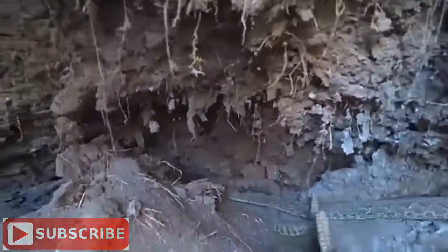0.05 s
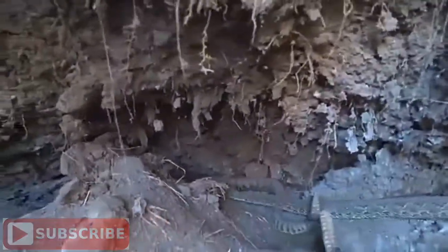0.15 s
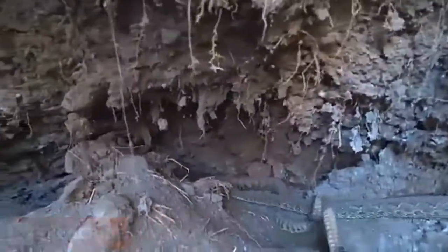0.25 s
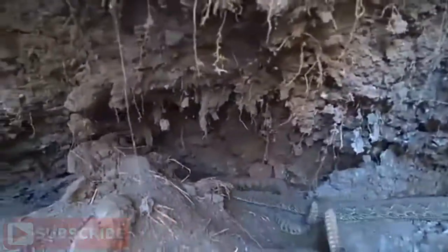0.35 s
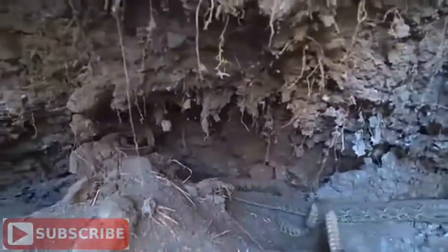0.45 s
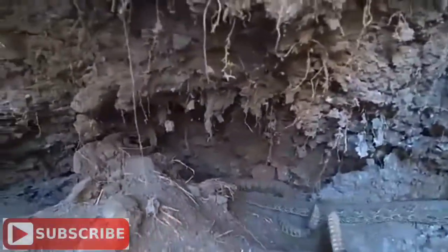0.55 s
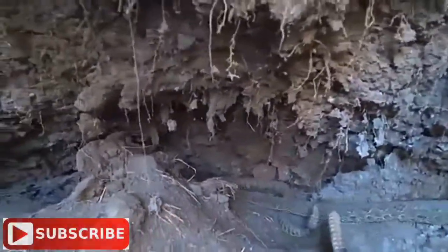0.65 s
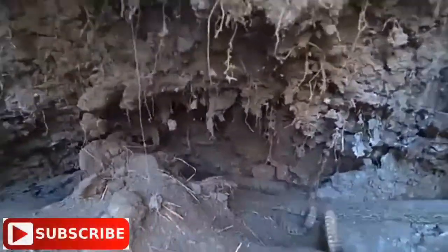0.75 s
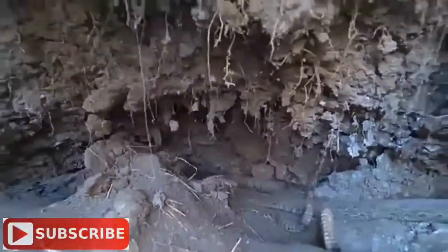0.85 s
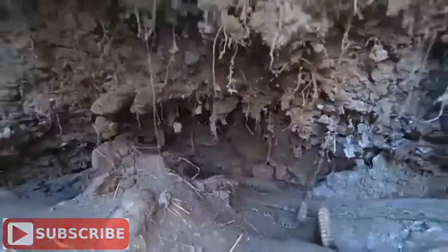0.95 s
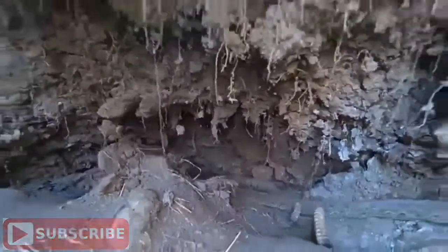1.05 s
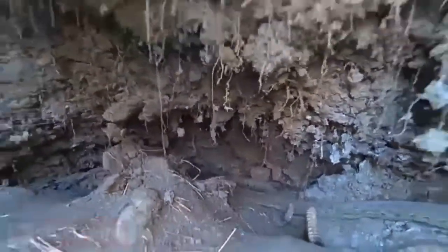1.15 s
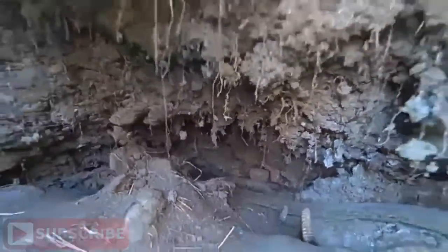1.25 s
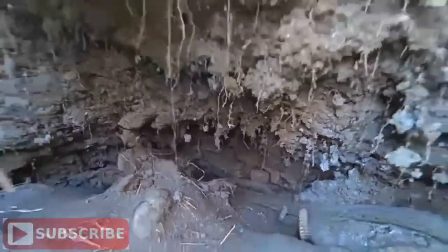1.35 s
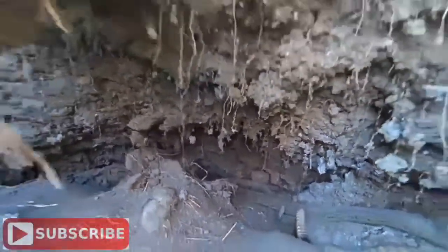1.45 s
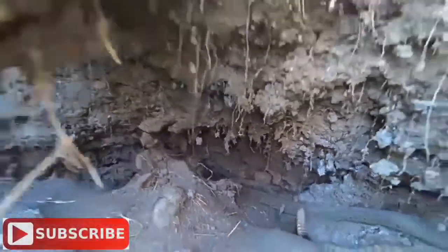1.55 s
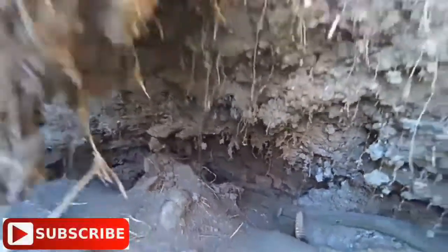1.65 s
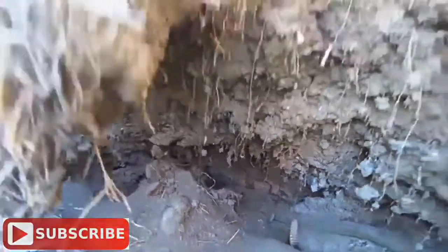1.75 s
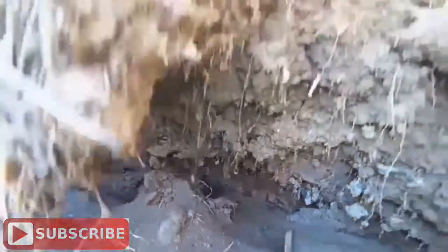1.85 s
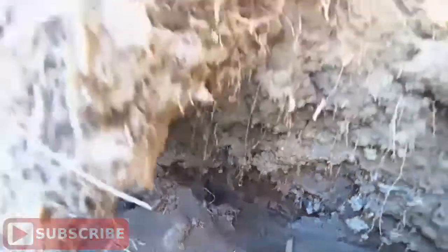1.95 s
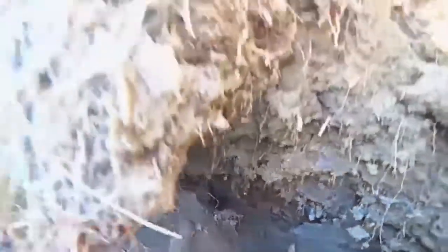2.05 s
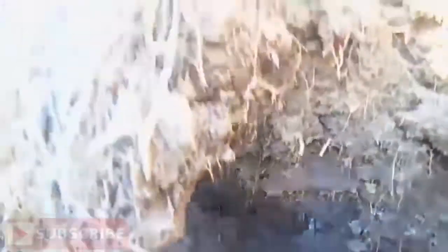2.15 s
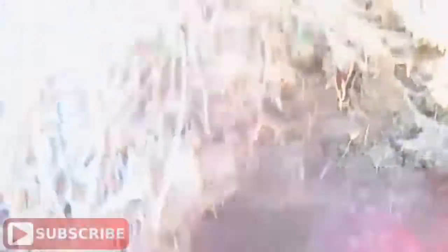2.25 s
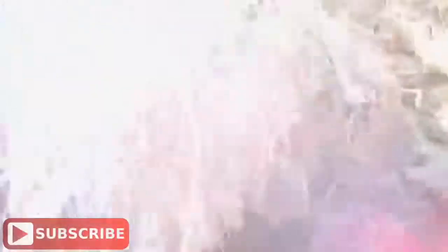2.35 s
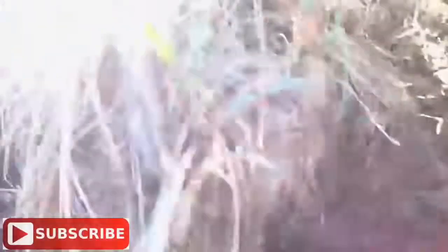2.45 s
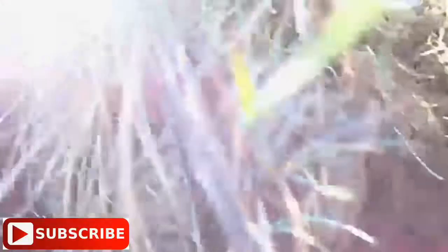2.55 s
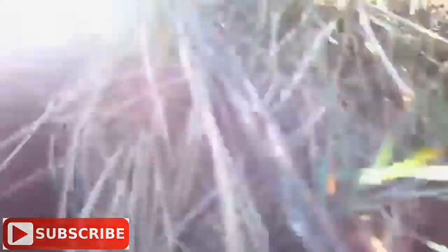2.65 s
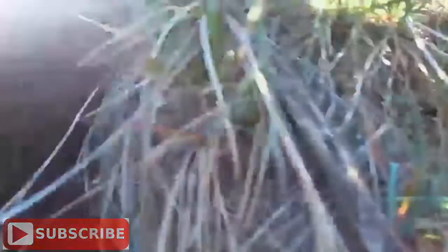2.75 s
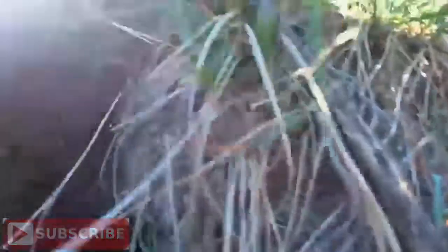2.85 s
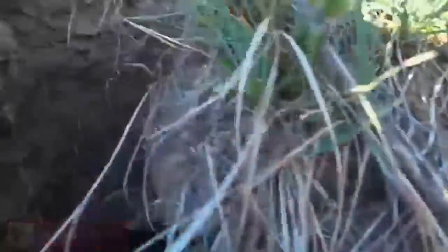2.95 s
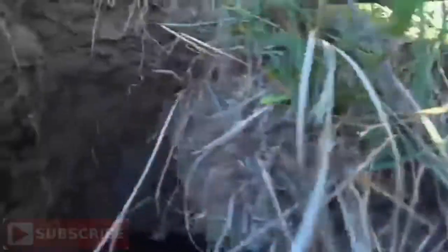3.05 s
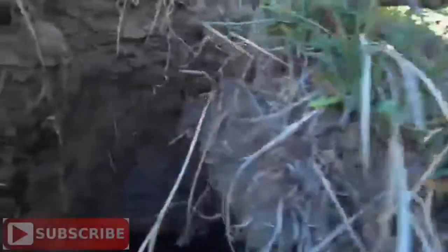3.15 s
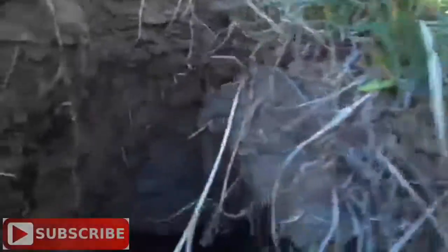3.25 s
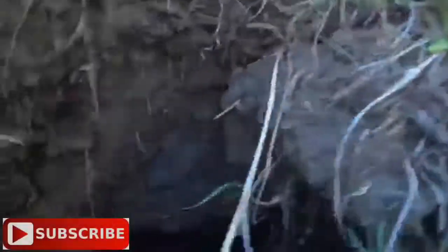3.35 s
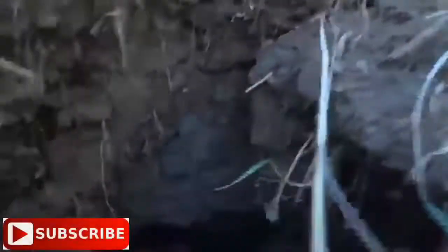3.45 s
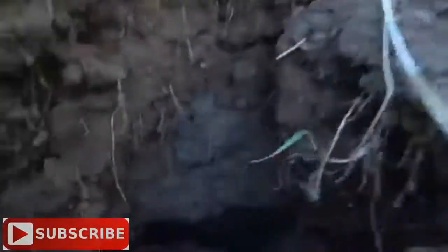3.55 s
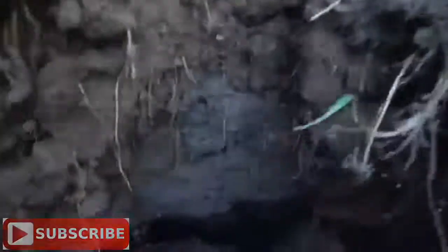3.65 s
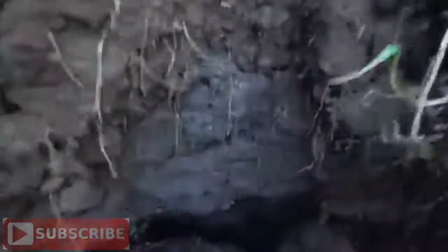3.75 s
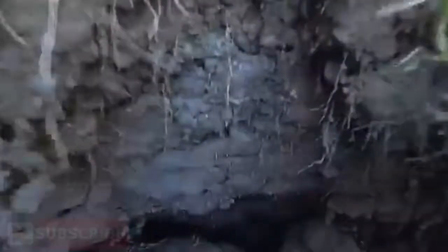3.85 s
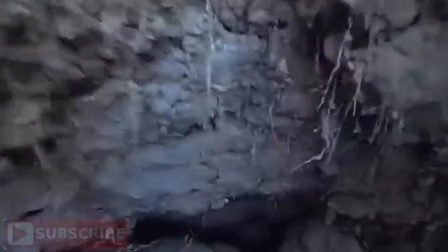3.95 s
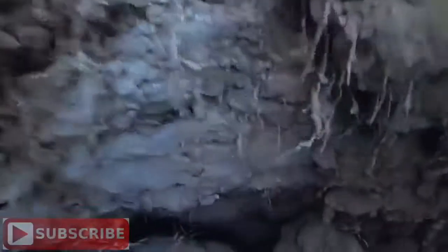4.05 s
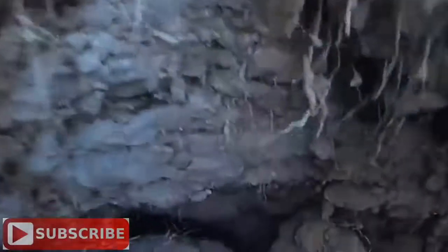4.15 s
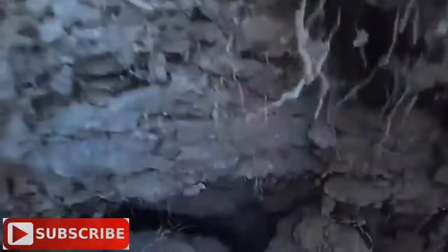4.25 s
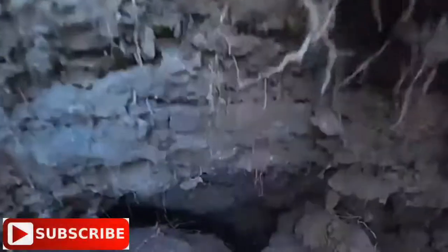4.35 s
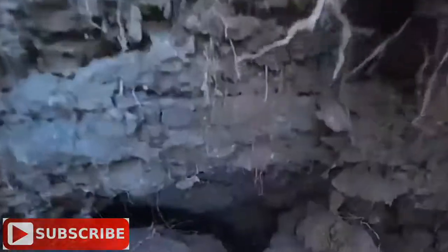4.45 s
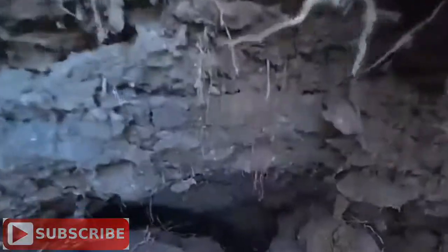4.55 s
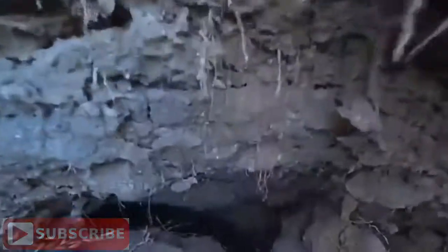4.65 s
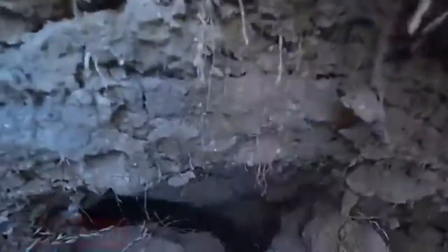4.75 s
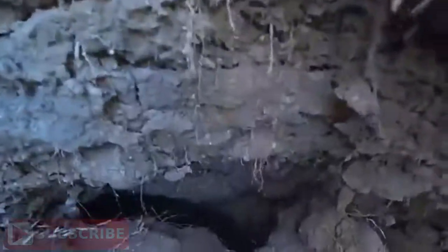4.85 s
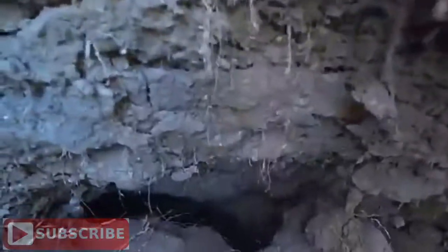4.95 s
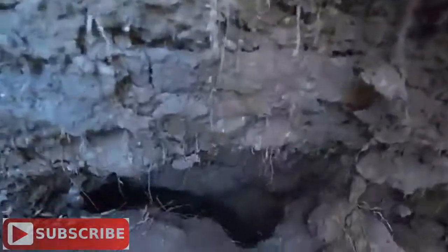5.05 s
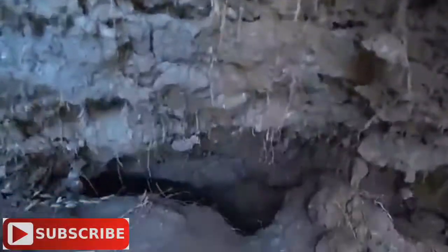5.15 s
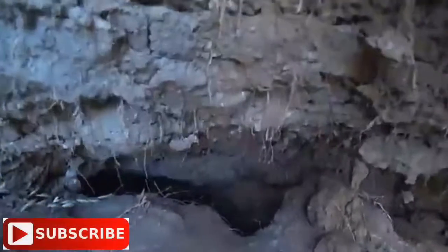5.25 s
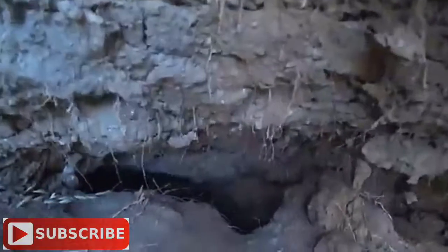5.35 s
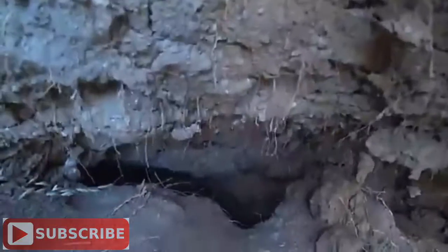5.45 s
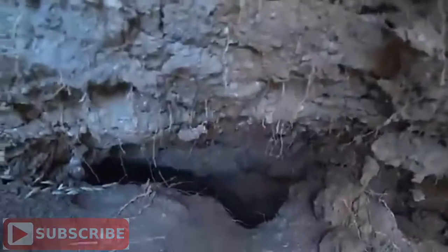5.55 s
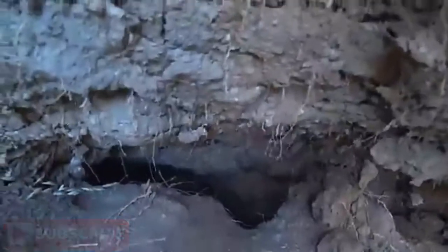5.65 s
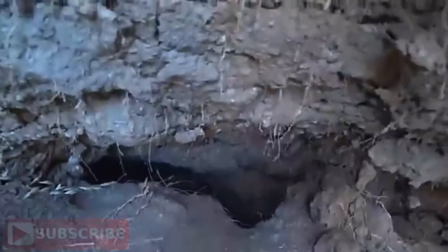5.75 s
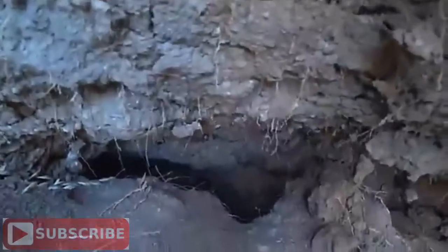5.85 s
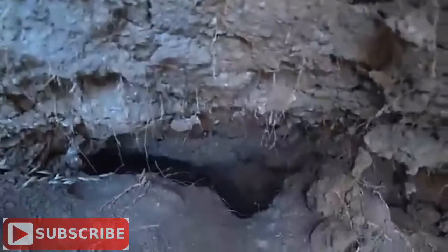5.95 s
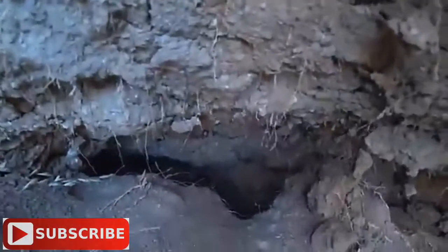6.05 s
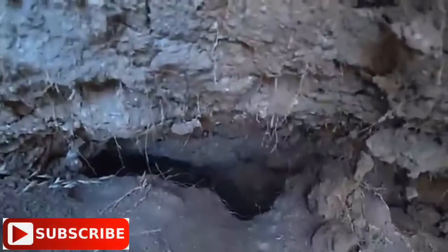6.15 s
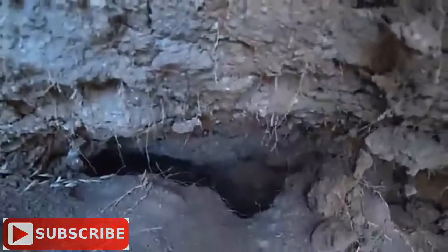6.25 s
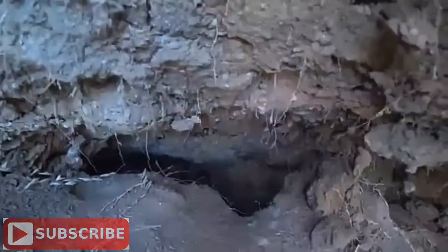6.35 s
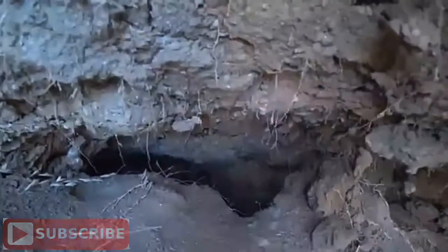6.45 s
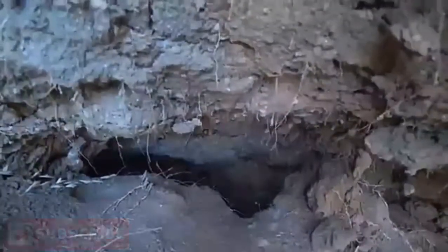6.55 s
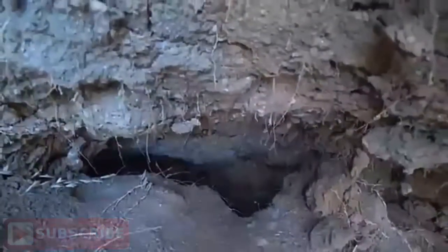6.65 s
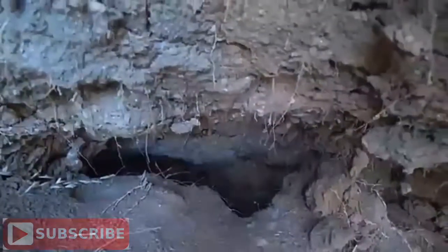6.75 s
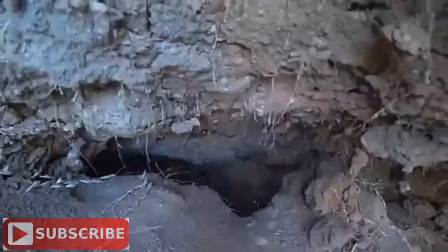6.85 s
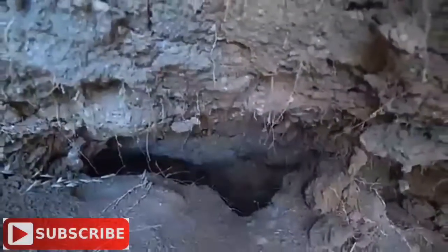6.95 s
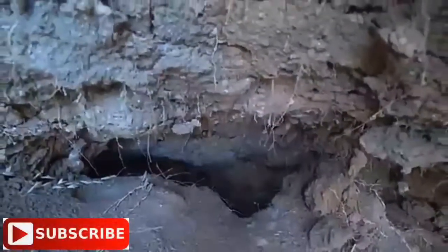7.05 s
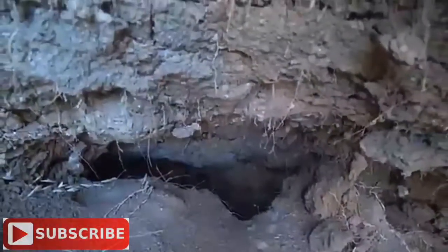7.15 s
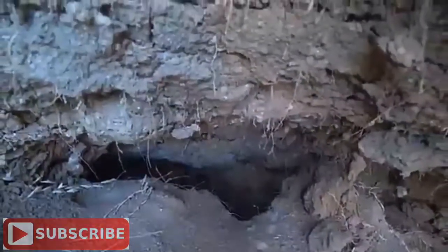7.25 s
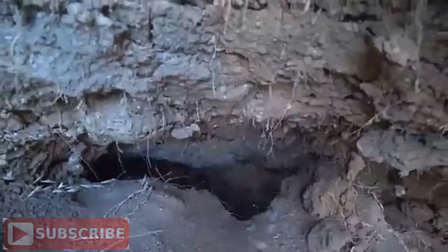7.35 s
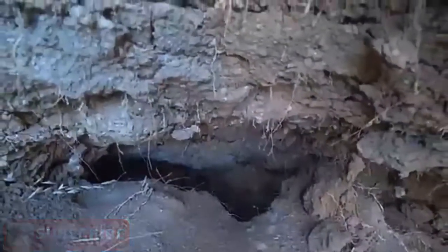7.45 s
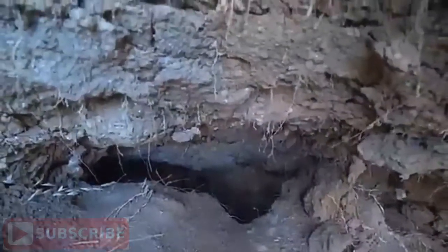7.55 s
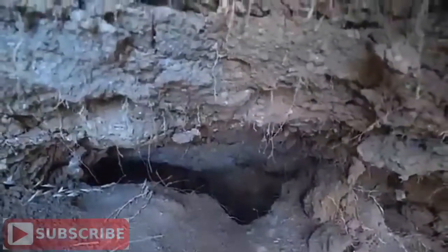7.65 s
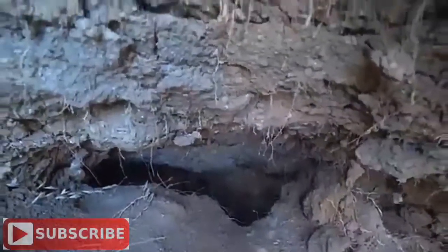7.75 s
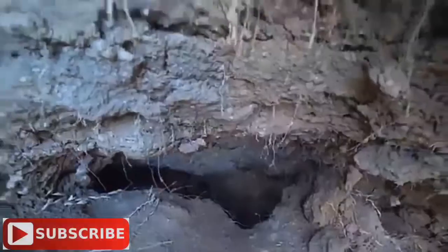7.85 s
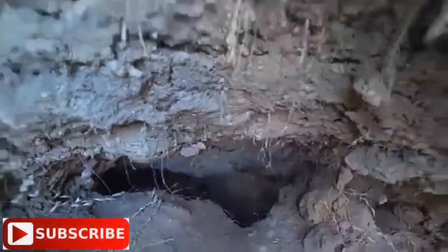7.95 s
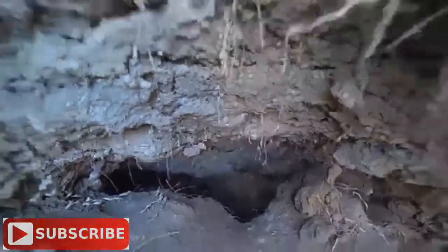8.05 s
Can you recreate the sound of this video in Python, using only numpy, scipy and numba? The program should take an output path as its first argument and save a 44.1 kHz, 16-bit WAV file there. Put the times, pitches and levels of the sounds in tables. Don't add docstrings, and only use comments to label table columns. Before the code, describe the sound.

Close, hand-held outdoor capture of a rattlesnake's tail: a rapid, raspy buzz, unsteady and gradually weakening, with a burst of rubbing and squeaking on the device. It drops almost to silence, leaving loose dry clicks, then rebuilds into a stronger, regular buzz whose tone shifts as the microphone moves by the hollow bank. Low handling thuds accompany the return; faint air lies beneath.

```python
import sys
import numpy as np
from scipy import signal
from scipy.fft import rfft, irfft, next_fast_len
from scipy.io import wavfile
from scipy.ndimage import uniform_filter1d
from numba import njit

SR = 44100
rng = np.random.default_rng(int(sys.argv[2]) if len(sys.argv) > 2 else 0)


def voltage_ratio(decibels):
    exponent = np.asarray(decibels, float) / 20
    return 10 ** exponent


def inscribe(sig):
    pcm = np.round(np.clip(np.atleast_2d(sig).T, -1, 1) * 32767)
    wavfile.write(sys.argv[1], SR, pcm.astype(np.int16))


N = 356328
T = np.arange(N) / SR
PADDED = next_fast_len(N)

# frequency_hz, density_db (per Hz)
AIR_SPECTRUM = [(12, -32), (20, -8), (45, 1), (90, -7), (130, -5), (200, -11.5), (270, -8.5), (420, -18),
                (800, -18), (1300, -19.5), (2000, -23.5), (5000, -36), (15000, -27.5)]
# time_s, level_db
GUSTS = [(0, -55.5), (.5, -53), (1.2, -53), (2.2, -56.5), (2.45, -54.5), (3.6, -56), (4.6, -52.5),
         (6.4, -57), (8.08, -56)]
# frequency_hz, right_lead_rad
AIR_LEAD = [(25, -0.8), (60, -1), (120, 0), (260, 0.66), (600, 2), (1300, 2.5), (2200, 1.5), (3000, 1)]

# frequency_hz, right_lead_rad
CASE_LEAD = [(40, .1), (80, .5), (140, 2.0), (260, 1.97), (1000, 1.98), (2200, 1.54), (2700, 2.1)]
# frequency_hz, left_minus_right_db
CASE_BALANCE = [(45, 0.3), (110, 4), (250, -4), (550, 6), (1200, 1.5), (2200, 2.5)]
# start_s, length_s, thud_db, squeak_db, grip_tightness (0-1)
RUBS = [(1.135, .03, -69, -51, 1), (1.199, .165, -70, -43.5, .9), (1.658, .05, -41, -28, 0.27),
        (1.7, .115, -52, -36.5, 0.4), (1.815, .05, -57, -43, .6), (1.858, .05, -60, -37.5, .6),
        (1.912, .06, -51, -43, .5), (1.977, .075, -52, -38, 0.7), (2.015, .1, -59, -62, .5),
        (3.5, .3, -57, -75, .5), (3.802, .07, -52.5, -74, 0.4), (4.041, .1, -54, -49.5, 0.7),
        (4.154, .19, -51, -72, .5), (4.362, .2, -53, -37.5, 0.46), (4.546, .155, -57, -37.5, 0.45),
        (4.7, .16, -53, -55, 0.49), (4.861, .3, -53, -62, 0.7), (5.145, .07, -52, -50, .4),
        (5.195, .07, -47, -47.5, 0.7), (5.31, .15, -54, -57.5, 0.5), (5.465, .055, -46.5, -50, 0.7),
        (5.528, .2, -56, -63, .5), (7.83, .07, -48.5, -50.5, 0.43), (7.887, .07, -46, -45, 0.8),
        (7.986, .1, -55, -45.5, .8)]
# start_s, peak_db, squeak_minus_thud_db
KNOCKS = [(0.383, -53, -14), (1.657, -32, -6), (1.678, -22, -2), (1.719, -28, -4), (2.026, -31.5, -7),
          (2.786, -48, -15), (3.512, -47, -19), (3.757, -40.5, -27), (3.798, -42, -24), (3.902, -28.5, -21),
          (4.005, -31, -20), (4.082, -34, -22), (4.104, -33, -22), (4.166, -31.5, -18), (4.205, -31, -16),
          (4.314, -30.5, -19), (4.654, -29.5, -14), (4.385, -36, -5), (5.275, -43, -25), (5.39, -42, -25),
          (4.732, -33, -9), (4.795, -30, -22), (5.073, -42, -15), (5.786, -42, -11), (5.828, -37.5, -21),
          (5.929, -42, -26), (5.959, -36.5, -27), (7.884, -42, -9), (7.941, -35, -14), (8, -46, 13)]
# start_s, peak_db, squeak_minus_thud_db
JERKS = [(1.087, -58.5, 14.5), (1.241, -48, 19), (1.262, -48, 18.5), (1.305, -49.5, 18.5),
         (1.763, -34.5, 12.5), (1.79, -39, 14.5), (1.882, -38, 15.5), (2.003, -44.5, 14), (.493, -50, 4.5),
         (4.328, -34, -11), (2.295, -54, -17)]
# start_s, length_s, from_hz, to_hz, level_db
CASE_TONES = [
    (1.74, .09, 277, 257, -43.5),
    (1.676, .06, 335, 320, -36),
    (2.015, .12, 314, 290, -47.5),
    (1.97, 0.0926, 1230, 1380, -42),
    (1.658, .055, 1120, 1130, -33),
    (1.7, .06, 2070, 2050, -49),
    (1.72, 0.11, 790, 800, -45),
    (1.2, 0.069, 330, 300, -48.5),
    (4.4, 0.3, 300, 300, -53),
]
# frequency_hz, width_hz, level_db
THUD_MODES = [(110, 61, -11.5), (182, 30, -4.5), (282, 20.6, 5.5), (337, 125, -0.5), (533, 178, -7.5),
              (870, 160, -10)]
# frequency_hz, width_hz, level_db
SQUEAK_MODES = [(727, 225, -11), (1068, 88, -1), (1183, 65, 4), (1296, 81, 3.5), (1700, 120, -13),
                (2030, 240, -17)]
# frequency_hz, width_hz, level_db
KNOCK_MODES = [(115, 60, -7), (330, 120, 0.5), (480, 154, -3), (850, 220, -15), (1050, 110, 2)]

# time_s, swing_hz, unsteadiness (0-1), clack_depth_db, slap_db
TAIL = [
    (0, 53.1, 0.11, 5, 13.5),
    (2.3, 53.31, 0.14, 8, 15),
    (3.05, 53, 0.09, 5.5, 16),
    (3.5, 53, 0.08, 7, 13),
    (4.2, 54.73, 0.06, 8, 21.5),
    (5.2, 54.4, .05, 9.5, 16),
    (5.4, 54.3, 0.05, 11.5, 13),
    (5.6, 54.7, .025, 8.5, 20.5),
    (6.5, 54.5, .015, 9.5, 21.5),
    (8.08, 54.4, 0, 9, 19.5),
]
# time_s, depth_db, length_ms
FALTERS = [(0.158, 8.5, 26), (.24, 2, 71), (0.372, 8, 18), (0.456, 5.5, 32), (1.003, 8, 9.4),
           (1.087, 8.5, 21), (1.216, 7, 10.5), (1.299, 7.5, 23), (1.473, 11, 23), (1.553, 11, 26),
           (1.632, 7, 15), (1.751, 3.5, 52), (1.866, 6.5, 26), (2.06, 11, 28), (2.149, 7, 24),
           (2.228, 6, 27), (2.329, 10.5, 20), (2.56, 5, 44), (2.79, 6, 14), (2.862, 10, 32), (3.045, 5, 20),
           (.575, 2.5, 26), (1.43, 3.5, 23), (1.92, 4.5, 20), (2.961, 7, 22), (3.21, 8, 12), (3.4, 7, 57),
           (3.478, 3, 59), (3.609, 8.5, 25),
           (0.013, 9.4, 24), (.09, 5.4, 14), (.67, 3.4, 25), (.855, 2.4, 15), (3.571, 15, 7.8),
           (5.361, 16, 9), (.076, 7.8, 9), (.099, 5, 6), (.142, 5, 5.1), (2.53, 5, 40), (2.842, 4.5, 11),
           (3.158, 7.6, 9), (3.421, 8, 6), (3.537, 7, 5), (5.398, 11, 7.4), (5.434, 11.5, 7.5)]
# frequency_hz, width_hz, level_db
SEGMENT_MODES = [(3160, 900, -3), (4880, 970, -1.5), (6440, 1140, 0), (8170, 1500, -1), (9920, 1870, 1.5),
                 (12300, 3800, 0.5)]
# frequency_hz, width_hz, level_db
SLAP_MODES = [(6900, 3600, 3.5), (10200, 3600, 2.5)]
# time_s, peak_db, ring_hz
LONE_CLACKS = [(2.3516, -26, 4130), (2.36, -25, 7280), (2.3874, -29, 5160), (2.3989, -25, 8010),
               (2.4703, -29, 8670), (2.5074, -38, 8730), (2.5875, -37, 5980), (2.6145, -36, 8330),
               (2.6354, -30, 12100), (2.6607, -33, 5600), (2.7102, -31, 9770), (2.7222, -27, 6210),
               (2.7513, -22, 6260), (2.7644, -23.5, 6400), (2.8045, -32, 6320), (2.822, -27, 6490),
               (2.8764, -27, 6430), (2.9153, -25, 6470), (2.9367, -23, 4880), (2.9906, -25.5, 5110),
               (3.0044, -28, 6620), (3.1672, -26.5, 4770), (3.1994, -29, 4800), (3.25, -24.5, 4720),
               (3.4261, -26, 9770), (3.4491, -24, 8010), (3.5269, -22, 5220), (3.5902, -24, 9260),
               (3.6207, -19, 9820), (5.3692, -13, 9620), (5.4061, -10, 9640)]
# frequency_hz, density_db (per Hz)
SHELL_SPECTRUM = [(880, -43), (1500, -46), (2800, -31), (4020, -12), (4710, -2), (4940, -1), (5670, -1),
                  (6500, -2), (7600, -2.5), (9700, -2.5), (10700, -4), (11900, -3.5), (14500, -13),
                  (15500, -18.5)]
# frequency_hz, density_db (per Hz)
SHOULDER_SPECTRUM = [(300, -42), (600, -23), (1100, -21), (1860, -16.5), (2350, -12), (2700, -4.5),
                     (3600, -5.5), (4300, -4), (5000, -26.5)]

# time_s, level_db
BUZZ_LEVEL = [(0, -26.5), (.22, -27), (.44, -26.5), (1.1, -30), (1.76, -31), (2.27, -33.5), (2.34, -39.5),
              (2.42, -45), (2.5, -54.5), (2.7, -55.5), (2.725, -45.5), (2.93, -42), (3.06, -52),
              (3.3, -43.5), (3.75, -29.5), (4.1, -27), (5.6, -23), (8.08, -26)]
# time_s, into_hollow (0-1), behind_rim (0-1)
PHONE = [
    (0, 0.01, 0),
    (2.27, 0.07, 0),
    (2.36, 0.21, 0.85),
    (3.1, 0.04, 0.5),
    (3.6, 0.23, 0.66),
    (3.9, 0.61, 0.33),
    (5, 0.98, 0.3),
    (8.08, 0.83, 0.36),
]
# time_s, level_db
SIDE_ECHO = [
    (0, -14.5),
    (1.1, -17),
    (1.4, -20),
    (2.1, -23.5),
    (2.45, -29),
    (2.6, -5),
    (3.05, -12),
    (3.25, -26),
    (4, -38.5),
    (8.08, -37.5),
]
# frequency_hz, gain_db
SIDE_SPECTRUM = [(1500, -5), (2800, 7), (4600, 1), (6000, -5.5), (8500, -12), (11000, -6), (13000, 4),
                 (15000, -2)]
# start_s, length_s, from_hz, to_hz, depth (0-1)
NOTCHES = [(0.05, 0.45, 7300, 5360, 0.56), (.3, 1.5, 5130, 5600, 0.37), (0.5, 0.93, 5300, 8230, 0.09),
           (1.9, 0.44, 5330, 7000, 0.47), (0.4, 0.96, 3650, 4130, 0.13), (1.5, 0.62, 11000, 10800, 0.2),
           (2.95, .9, 2100, 2300, 0.75), (3.7, .7, 2400, 2700, .6), (3, 0.97, 5150, 9300, 0.7),
           (3.5, 0.62, 2600, 4600, 0.24), (3.5, 0.72, 4550, 6600, 0.6), (4, 1.53, 6900, 8600, 0.62),
           (4, 2.16, 10100, 11200, 0.45), (4.1, 2.65, 2900, 2880, 0.59), (6.5, 2.15, 2600, 3420, 0.6),
           (5.2, 1.62, 8370, 9670, 0.94), (5, 2.89, 5270, 6170, 0.87), (6.5, 1.71, 7030, 8870, 0.58),
           (6.5, 0.78, 9404, 10800, 0.53), (7.1, 1, 11000, 12200, 0.55), (2.5, 0.22, 4400, 4500, 0.4),
           (3, 0.33, 9000, 9300, .4), (4.5, 0.57, 4200, 3900, 0.28), (8, .9, 2200, 3400, 0.4)]
# start_s, length_s, from_hz, to_hz, lift (0-1)
LIFTS = [(-0.16, 0.38, 4100, 3800, 0.77), (1.8, .7, 4100, 4450, 0.4), (2.5, .3, 3900, 3900, 0.5),
         (1.6, .4, 11500, 12000, 0.6), (2.5, 0.21, 6800, 7000, .6), (1.5, 0.33, 10200, 9500, 0.35),
         (0.16, 1.49, 8500, 8000, 1), (0.8, 0.58, 9200, 9600, 0.64), (1.33, 1.27, 4300, 4600, 0.78),
         (2.5, 0.63, 6700, 6040, 0.8), (3, 0.72, 4700, 4300, 0.64), (3.5, 0.86, 9500, 10300, 0.43),
         (3.5, 1.78, 4140, 4970, 0.75), (4.5, 0.88, 9450, 9700, 0.34), (4.5, 0.83, 6500, 7000, 0.07),
         (5.5, 2.4, 12000, 11500, 0.52), (6, 2, 4500, 5050, 0.6), (7.1, 0.58, 9500, 9600, 0.23),
         (0.3, 1.02, 5300, 4700, 0.55), (3.5, 0.62, 3200, 4400, 0.7), (2, 0.22, 7500, 8000, 0.66),
         (3.5, .35, 11000, 12000, .6), (3, 0.35, 7200, 7800, 0.45), (7.5, 0.51, 4600, 4700, 0.22)]
# start_s, length_s, from_hz, to_hz, depth (0-1)
SLITS = [(2.95, 0.56, 2500, 4200, .8), (3.4, 0.71, 4000, 6450, 0.77), (3.2, 0.9, 5300, 9400, 0.7),
         (0.45, 1.14, 5500, 5750, 0.6), (1.27, 0.53, 5900, 7400, 0.6), (0.47, 0.72, 4300, 4700, 0.22),
         (2.66, .2, 3100, 4300, 0.7), (3.7, 3.35, 2700, 2750, 0.58), (7.1, 0.92, 2660, 3500, 0.9),
         (3.1, .6, 8400, 10500, 0.4)]


def level(x, db):
    return x * voltage_ratio(db) / np.sqrt(np.mean(x ** 2))


def columns(table):
    seconds, *rest = np.transpose(table)
    return [np.interp(T, seconds, column) for column in rest]


def over_hz(table):
    hz, value = np.transpose(table)
    bins_hz = np.fft.rfftfreq(PADDED, 1 / SR)
    return np.interp(np.log(bins_hz + 1), np.log(hz), value)


def colour(x, table):
    return irfft(rfft(x, PADDED) * voltage_ratio(over_hz(table)), PADDED)[:N]


def smooth_filter(x, kind, order, hz):
    return signal.sosfilt(signal.butter(order, hz, kind, fs=SR, output="sos"), x)


@njit
def moving_bandpass(x, hz, width):
    y, band, low = np.empty(len(x)), 0., 0.
    for i in range(len(x)):
        g, damping = np.tan(np.pi * hz[i] / SR), width / hz[i]
        v = (band + g * (x[i] - low)) / (1 + g * (g + damping))
        band, low = 2 * v - band, low + 2 * g * v
        y[i] = damping * v
    return y


def ring(x, modes):
    total = 0
    for k, (hz, width_hz, db) in enumerate(modes):
        b, a = signal.iirpeak(hz, hz / width_hz, SR)
        total = total + (-1) ** k * voltage_ratio(db) * signal.lfilter(b, a, x)
    return total


def walk(rate):
    hold = int(SR / rate)
    steps = np.repeat(rng.standard_normal(N // hold + 1), hold)
    return 1.286 * uniform_filter1d(uniform_filter1d(steps, hold), hold)[:N]


def flicker(rate):
    w = walk(rate)
    return w - uniform_filter1d(w, size=SR // 14)


def clicks(per_s, spread_db, most_db):
    when, sign, size = rng.random((3, N))
    size_db = np.minimum(-spread_db * np.log(size + 1e-9), most_db)
    return (when < per_s / SR) * np.sign(sign - .5) * voltage_ratio(size_db)


def glide(x, s, length, from_hz, to_hz, width, wobble):
    near = slice(max(int(s * SR), 0), int((s + length) * SR))
    share = (T[near] - s) / length
    swell = np.abs(np.sin(np.pi * share)) ** 0.48
    centre_hz = from_hz * (to_hz / from_hz) ** share * wobble[near]
    return near, swell * moving_bandpass(x[near], centre_hz, width)


def ports(x, lead_rad, left_db):
    turn = np.exp(.5j * lead_rad)
    left, right = voltage_ratio(left_db / 2) / turn, voltage_ratio(-left_db / 2) * turn
    return irfft(rfft(x, PADDED) * np.array([left, right]), PADDED)[:, :N]


def air():
    gust_db = columns(GUSTS)[0]
    noise = level(colour(rng.standard_normal(N), AIR_SPECTRUM), -50)
    return noise * voltage_ratio(gust_db - gust_db.mean() + 1.0 * walk(9))


def breeze():
    return smooth_filter(voltage_ratio(-7.5) * np.array([air(), air()]), "band", 3, [160, 5000])


def slides():
    rise_db_s, sag_db_s, fall_db_s = 3000, 31, 1400
    db = np.full((3, N), -120.)
    for s, length, thud_db, squeak_db, tight in RUBS:
        near = slice(int((s - .1) * SR), int((s + length + .2) * SR))
        t = T[near] - s
        tilt_db = 8.5 * (tight - .5)
        shape = rise_db_s * np.minimum(t, 0) - sag_db_s * np.maximum(t, 0)
        shape = shape - fall_db_s * np.maximum(t - length, 0)
        peaks_db = np.c_[[thud_db, squeak_db - tilt_db, squeak_db + tilt_db]]
        db[:, near] = np.maximum(db[:, near], peaks_db + shape)
    return db


def rubs():
    thud_db, loose_db, tight_db = slides()
    slips = clicks(2500, spread_db=3.0, most_db=11) * voltage_ratio(np.clip(2 * flicker(90), -9, 4))
    thud = level(ring(slips, THUD_MODES), 0) * (voltage_ratio(thud_db) + voltage_ratio(loose_db - 14.5))
    loose = level(ring(slips, SQUEAK_MODES[:3]), -2.0) * voltage_ratio(loose_db)
    tight = level(ring(slips, SQUEAK_MODES[3:]), -3.5) * voltage_ratio(tight_db)
    return thud + loose - tight


def knocks():
    events = KNOCKS + JERKS
    low, high = np.zeros((2, N))
    pushes = rng.standard_normal((len(events), 900)) * 0.092 * np.exp(-np.arange(900) / SR / 0.0064)
    pushes[:, 0] = 1
    for (s, db, rel_db), push in zip(events, pushes):
        i = int(s * SR)
        low[i:i + 900] += voltage_ratio(db) * push
        high[i:i + 900] += voltage_ratio(db + rel_db) * push
    low, high = uniform_filter1d(low, size=36), uniform_filter1d(high, size=14)
    thud = voltage_ratio(37) * ring(low, KNOCK_MODES) + voltage_ratio(30.5) * ring(low, THUD_MODES)
    return thud + voltage_ratio(36.5) * ring(high, SQUEAK_MODES)


def case_tones():
    out, rub, steady = np.zeros(N), rng.standard_normal(N), np.ones(N)
    for *band, db in CASE_TONES:
        near, part = glide(rub, *band, 21.0, steady)
        out[near] += level(part, db)
    return out


def handling():
    grip = (rubs() + knocks() + case_tones()) * voltage_ratio(4.0)
    grip = grip - 0.65 * ring(grip, [(1530, 200, 0)])
    grip = smooth_filter(grip, "high", 2, 75)
    shake = voltage_ratio(-11.5) * np.array([np.roll(grip, shift=310), np.roll(grip, shift=520)])
    shake = smooth_filter(shake, "high", 2, 200)
    return ports(grip, over_hz(CASE_LEAD), over_hz(CASE_BALANCE)) + shake


def lone_clacks():
    out = np.zeros(N)
    chatter = rng.standard_normal((len(LONE_CLACKS), 400)) * np.exp(-np.arange(400) / SR / 0.0028)
    for (s, db, hz), tick in zip(LONE_CLACKS, chatter):
        i = int(s * SR)
        out[i:i + 400] += voltage_ratio(db) * (0.38 * tick + 1.45 * ring(tick, [(hz, 3500, 0)]))
    return voltage_ratio(-3.5) * colour(out, SHELL_SPECTRUM)


def end_slaps(phase, slap_db):
    ends = np.flatnonzero(np.diff(np.floor(phase / np.pi)))
    late, size = rng.standard_normal((N // 300, 2))[:len(ends)].T
    uneven_db = 2.0 * np.clip(size, -2.5, .2) + 2.0 * (-1) ** np.arange(len(ends))
    peak_db = slap_db[ends] + uneven_db
    at = np.clip(ends + (60 + 18 * late).astype(int), 0, N - 1)
    out = np.zeros(N)
    for k, mode in enumerate(SLAP_MODES):
        slaps = np.zeros(N)
        slaps[at[k::2]] = voltage_ratio(peak_db[k::2])
        out += 0.33 * slaps + ring(slaps, [mode])
    return out


def rattle():
    swing_hz, unsteady, clack_db, slap_db = columns(TAIL)
    phase = 2 * np.pi * np.cumsum(swing_hz * (1 + unsteady * walk(40))) / SR
    effort = voltage_ratio(0.4 * flicker(70))

    def bunch(lag):
        return voltage_ratio(clack_db * (np.cos(2 * phase - lag) + 0.38 * np.cos(phase - lag / 2)) / 2)

    dry = bunch(0) * level(clicks(5000, spread_db=1.5, most_db=14), -5)
    for k, mode in enumerate(SEGMENT_MODES):
        uneven = voltage_ratio(1.1 * flicker(75) + 15.6 * unsteady * walk(14))
        clacks = ring(clicks(2500, spread_db=3.0, most_db=11), [mode])
        dry += bunch(0.42 * k) * uneven * level(clacks, -7 + mode[2])
    dry = (dry + end_slaps(phase, slap_db)) * effort
    keep = np.exp(-1 / (SR * 0.011))
    envelope = np.sqrt(signal.lfilter([1 - keep], [1, -keep], dry ** 2))
    return dry + voltage_ratio(-6.0) * envelope * rng.standard_normal(N)


def shade(tail):
    into, hidden = columns(PHONE)
    low_db = -9.5 + (-24 - -9.5) * into
    top_db = -5 + (-16.5 - -5) * hidden
    x = colour(tail, SHELL_SPECTRUM)
    top = signal.sosfiltfilt(signal.butter(4, 10300, "high", fs=SR, output="sos"), x)
    low = level(colour(tail, SHOULDER_SPECTRUM), 0.39)
    return level(x - top, 0) + low * voltage_ratio(low_db) + level(top, -0.87) * voltage_ratio(top_db)


def bank_echoes(x):
    steady = np.ones(N)
    for *band, gain in LIFTS:
        near, part = glide(x, *band, 940.0, steady)
        x[near] += gain * part
    uneven, wobble = 1 + 0.3 * walk(11), 1 + 0.016 * walk(15)
    for k, (*band, depth) in enumerate(NOTCHES):
        near, part = glide(x, *band, 1720.0, wobble)
        x[near] -= np.clip(depth * np.roll(uneven, k * SR)[near], 0, .75) * part
    for *band, depth in SLITS:
        near, part = glide(x, *band, 530.0, steady)
        x[near] -= np.clip(depth * uneven[near], 0, 1) * part
    return x


def loudness_db():
    db = columns(BUZZ_LEVEL)[0]
    for s, depth_db, ms in FALTERS:
        near = slice(max(int((s - .1) * SR), 0), int((s + .1) * SR))
        spread = ms / 2355 * np.where(T[near] < s - .004, .55, 1.35)
        db[near] -= depth_db * np.exp(-.5 * ((T[near] - s + 0.0045) / spread) ** 2)
    return db


def buzz():
    x = bank_echoes(shade(rattle())) * voltage_ratio(loudness_db()) + lone_clacks()
    side = colour(np.roll(x, shift=37), SIDE_SPECTRUM) * voltage_ratio(columns(SIDE_ECHO)[0])
    return np.array([x + side, x - side])


def scene():
    return breeze() + ports(air(), over_hz(AIR_LEAD), left_db=0.0) + handling() + buzz()


def low_pass(x):
    return signal.sosfilt(signal.butter(12, 16330, fs=SR, output="sos"), x)


def record(dry):
    rounded = np.tanh(dry)
    top_cut = signal.ellip(10, .3, 60, 15050, fs=SR, output="sos")
    finished = signal.sosfilt(top_cut, rounded)
    return low_pass(finished)


dry = scene()
out = record(dry)
inscribe(out)
```